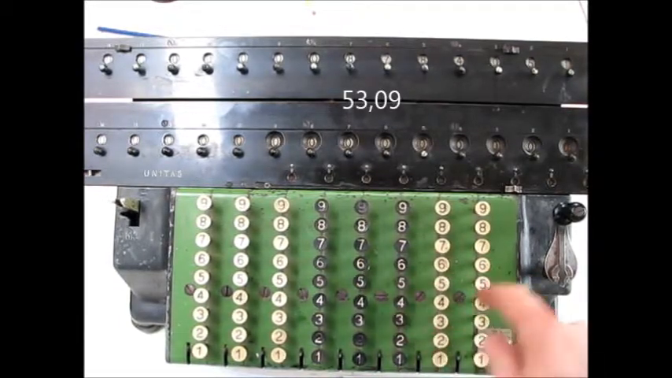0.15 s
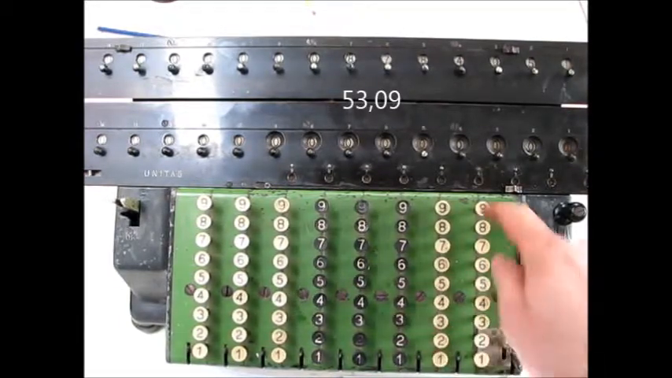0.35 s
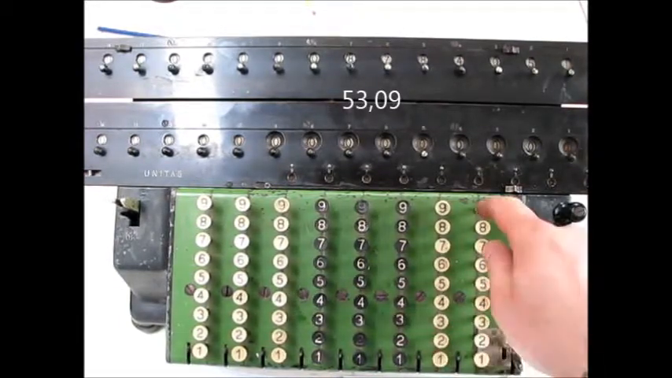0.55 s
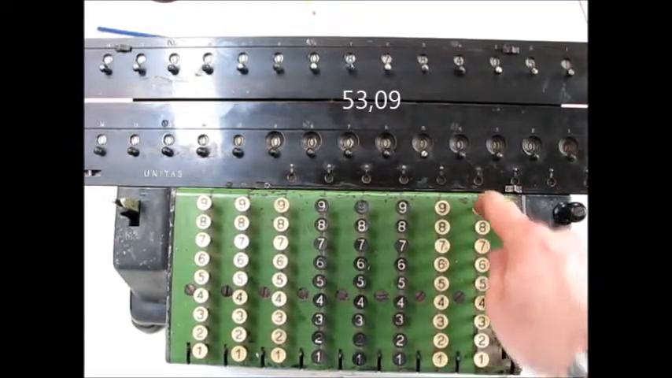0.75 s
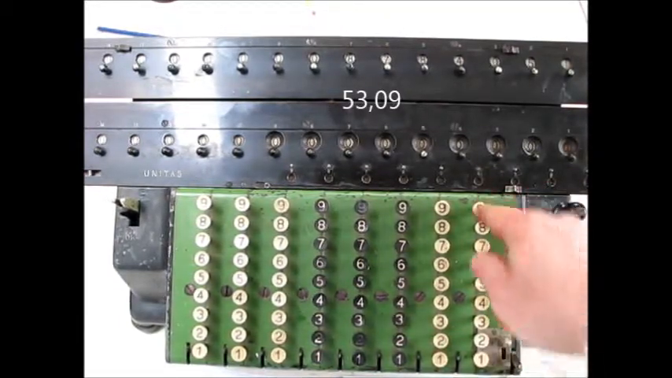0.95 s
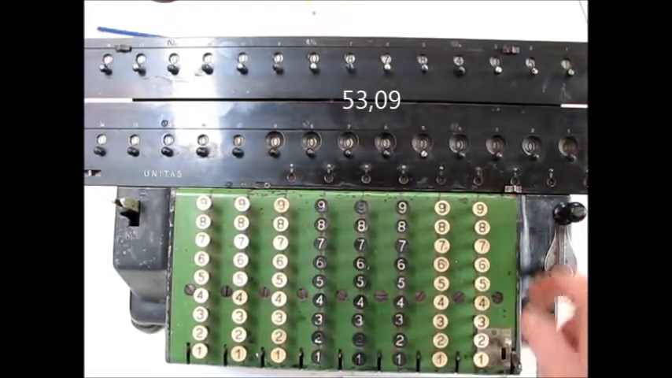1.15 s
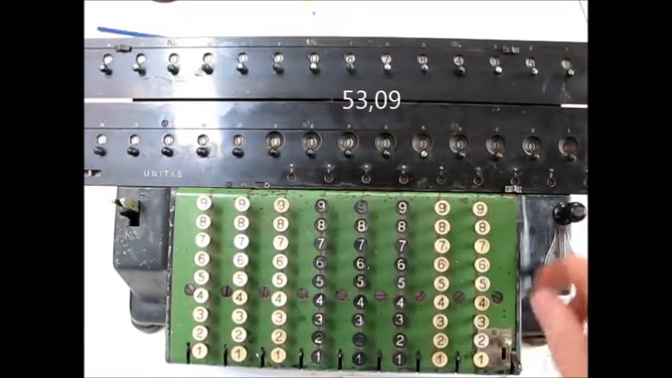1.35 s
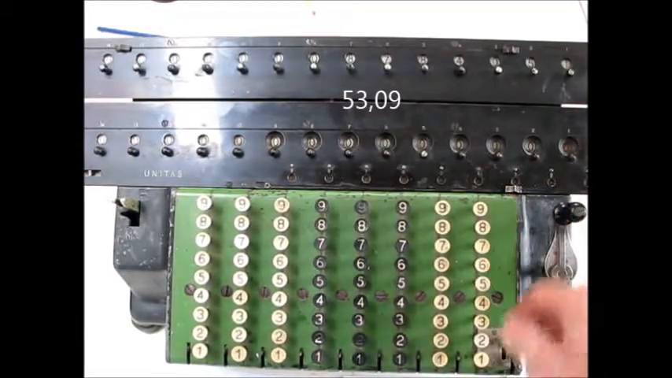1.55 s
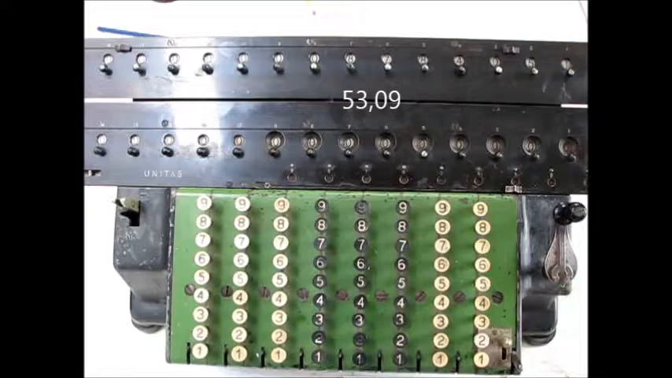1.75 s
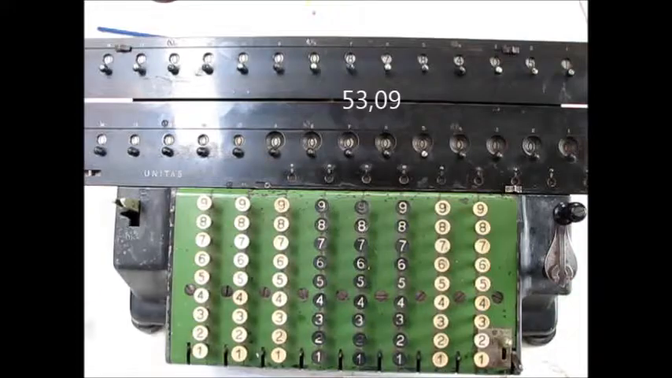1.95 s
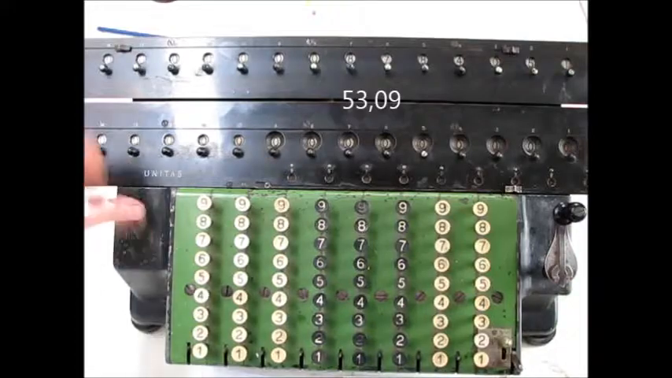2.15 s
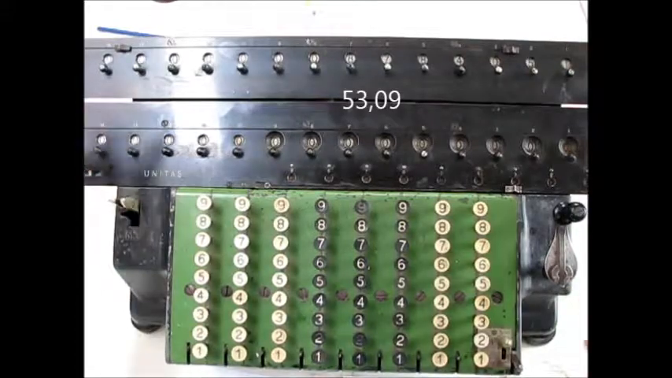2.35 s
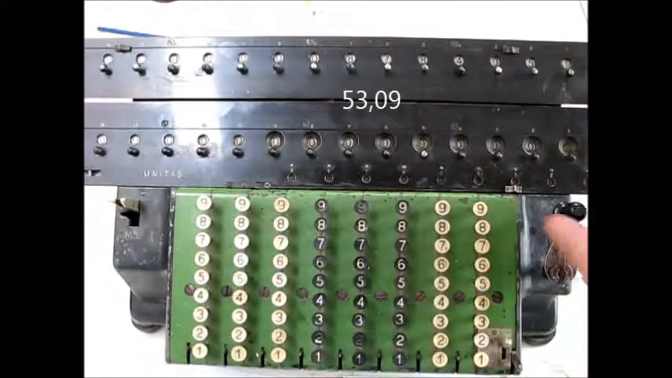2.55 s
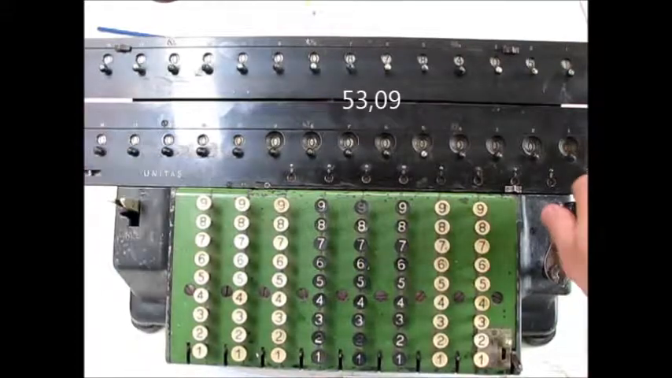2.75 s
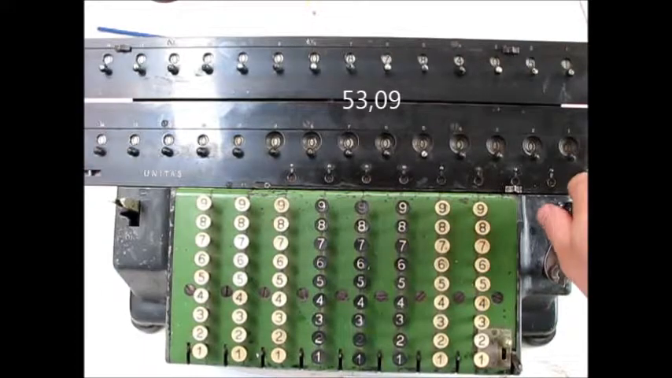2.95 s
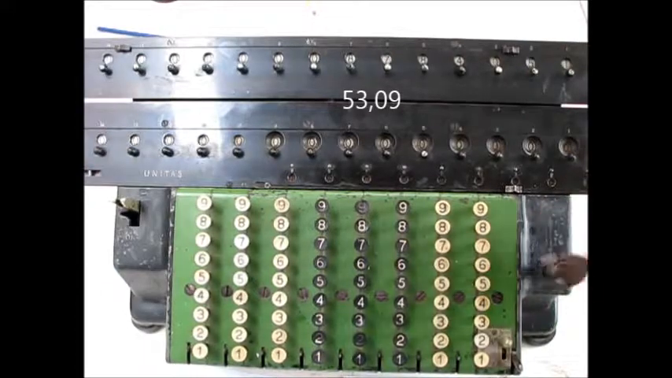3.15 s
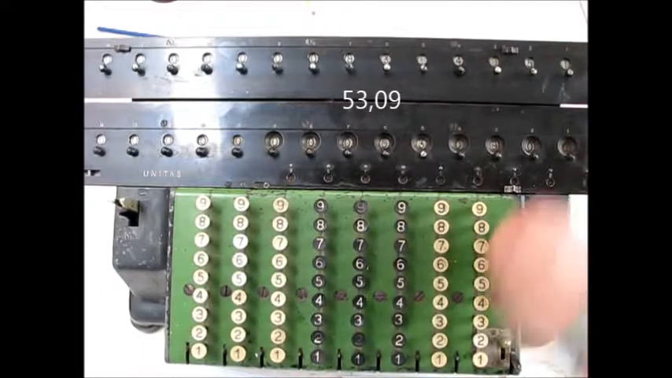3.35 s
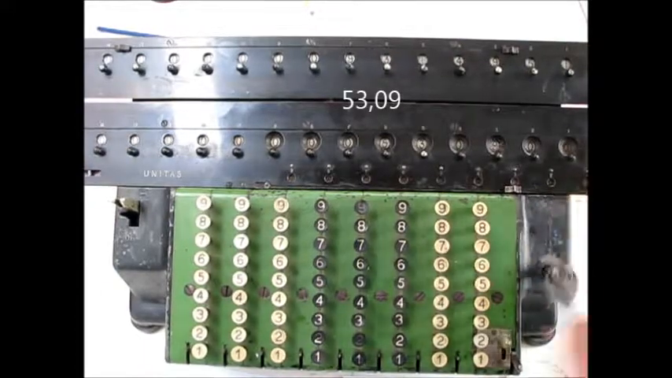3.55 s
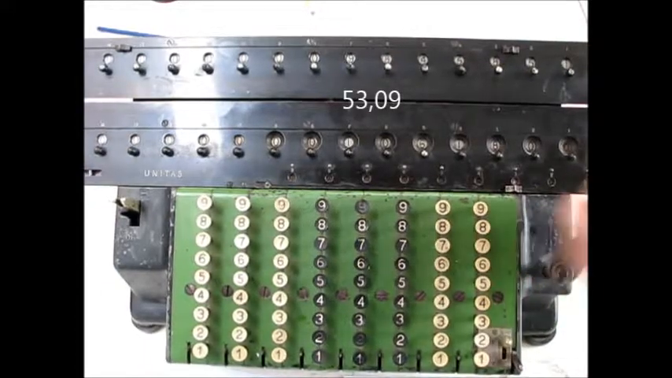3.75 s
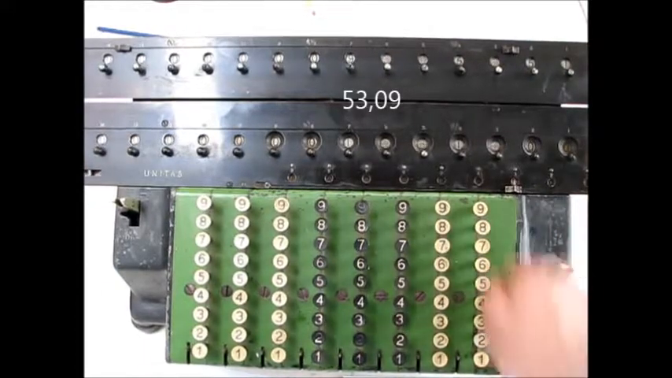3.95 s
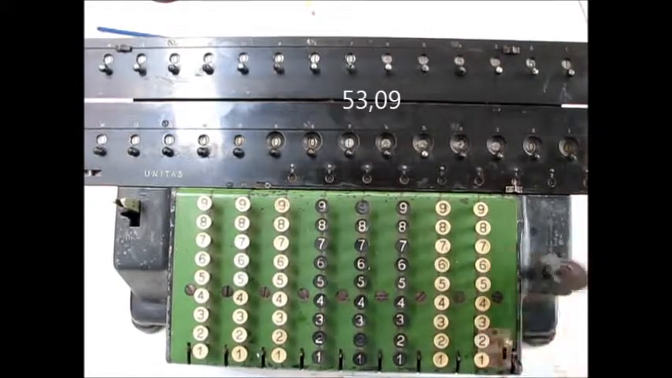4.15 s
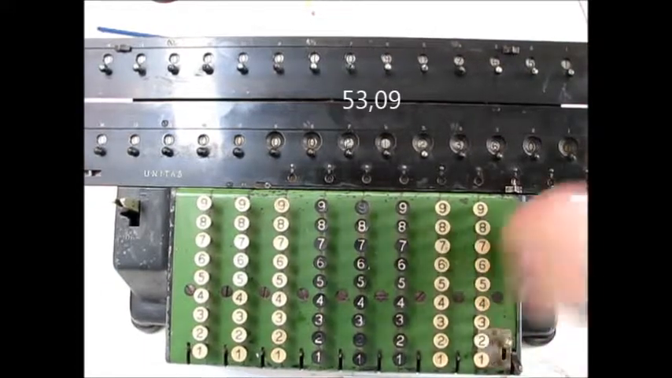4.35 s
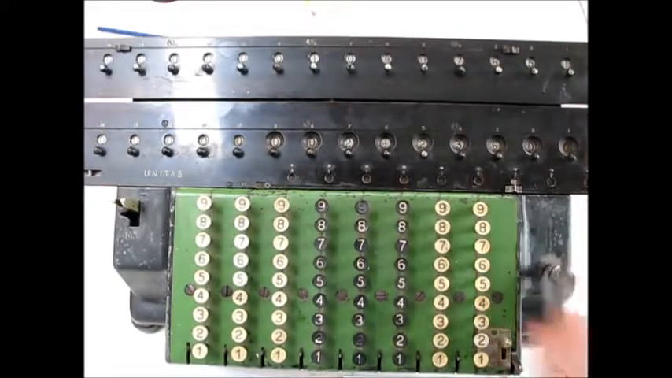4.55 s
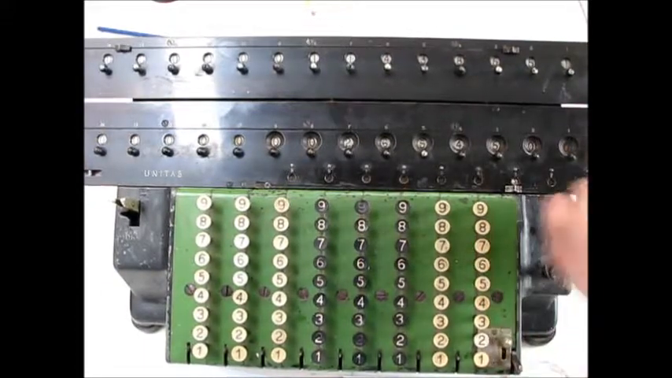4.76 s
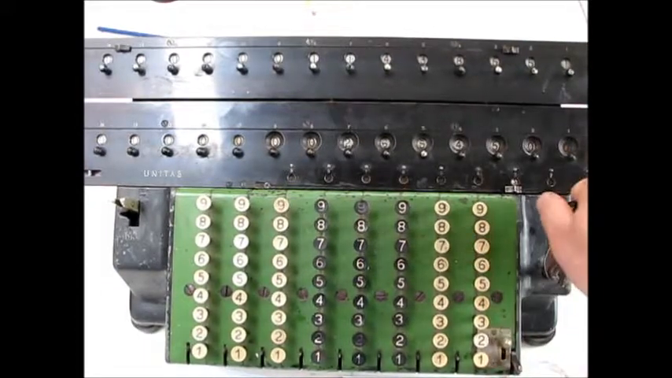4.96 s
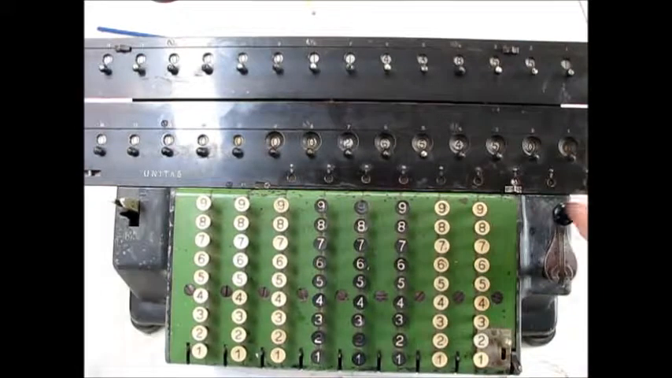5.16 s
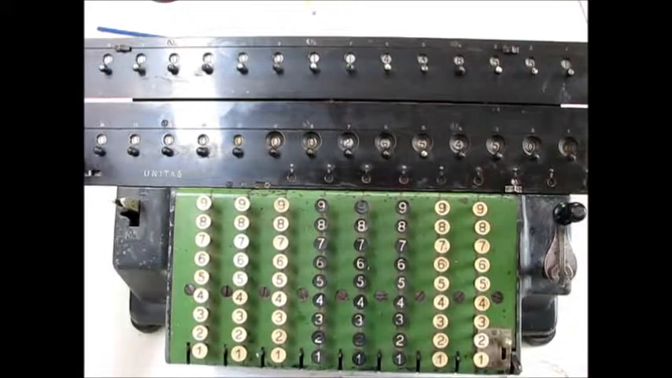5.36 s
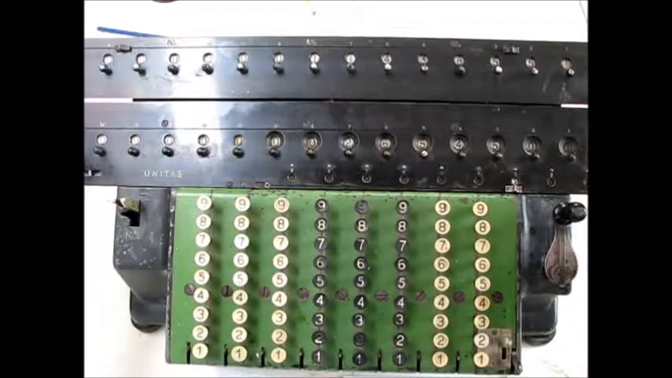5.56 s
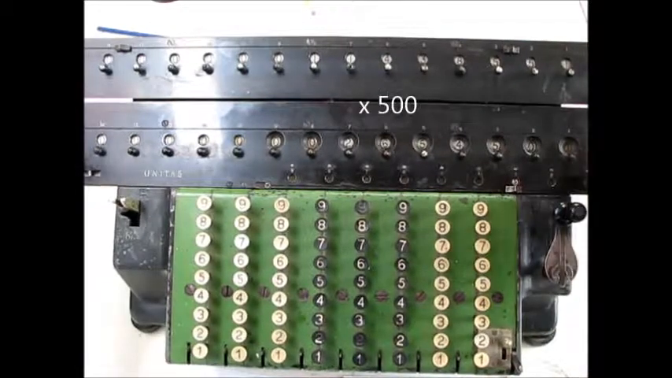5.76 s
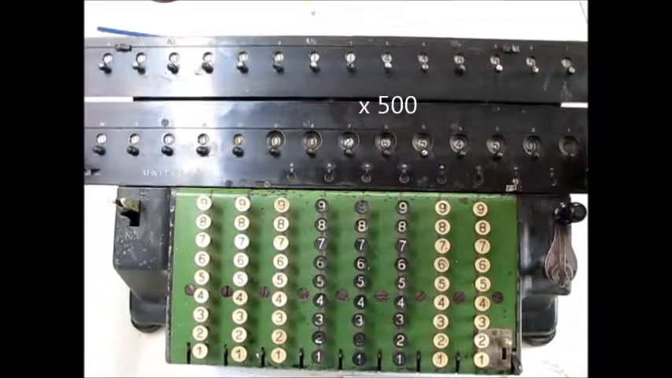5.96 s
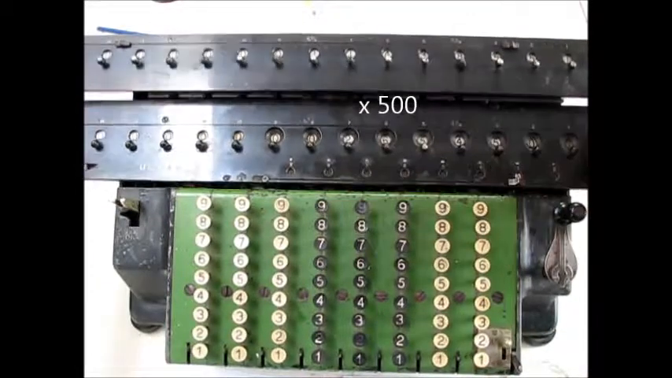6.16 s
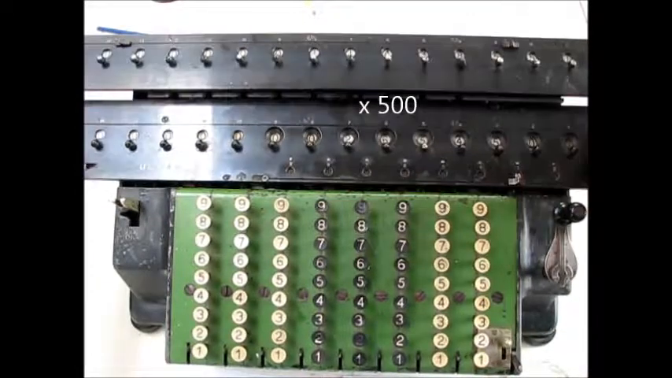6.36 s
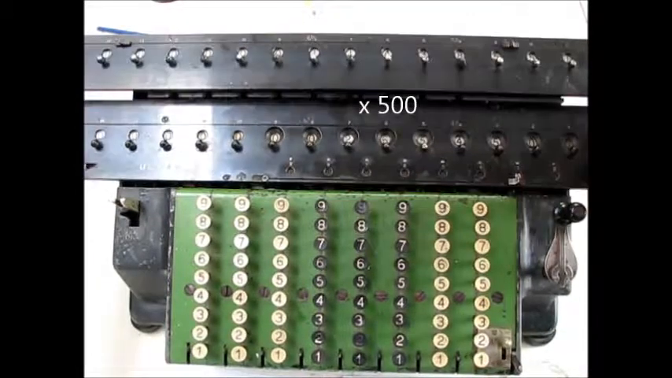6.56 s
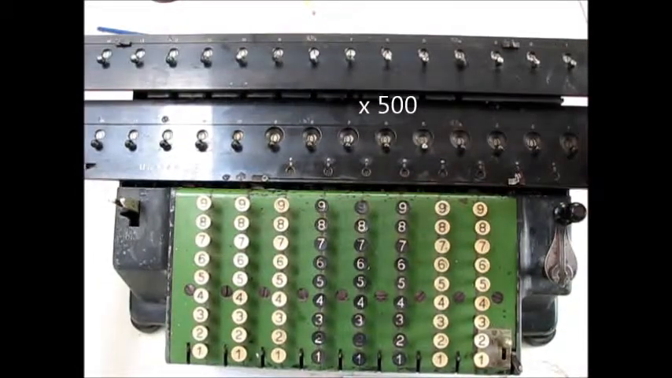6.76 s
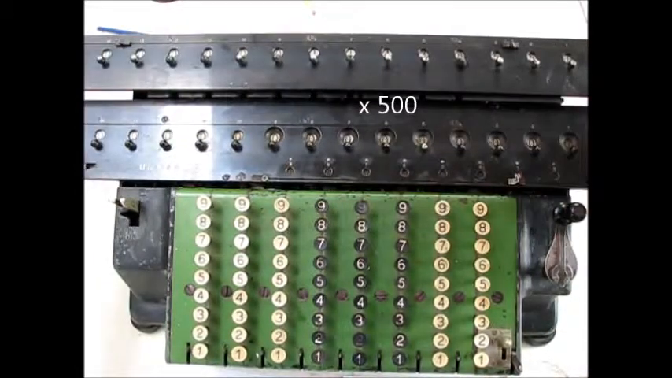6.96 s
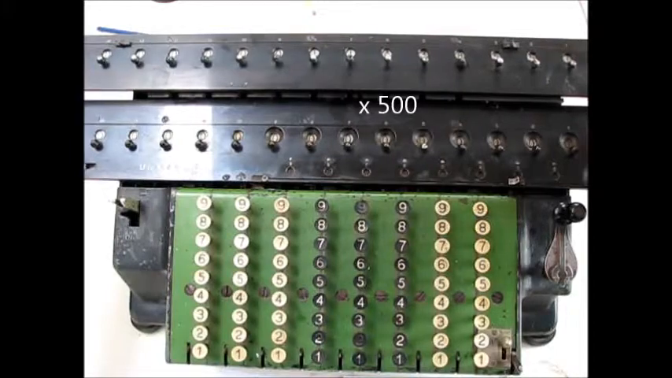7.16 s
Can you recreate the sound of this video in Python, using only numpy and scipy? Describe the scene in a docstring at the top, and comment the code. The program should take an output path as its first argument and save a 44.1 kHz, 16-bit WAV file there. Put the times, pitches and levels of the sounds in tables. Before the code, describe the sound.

In a bare room, an old metal adding machine clicks, whirs through five rapid clattering cranks, rests humming faintly, then its carriage clunks along.

```python
"""First the dying room tail of an earlier key press, over house rumble, hiss and a pulsing electric whine.
A hand-cranked mechanical calculator stands on a desk in a bare room, close under two microphone ports: a key
goes down at 0.7 s, a hand taps and slides on the casing, five crank turns run from 3.1 s, and from 6.2 s the
carriage is lifted, rattles along and drops in two steps. Each contact is a burst of noise force that rings the
resonances of the metal parts; running gears are dense ticks; desk and room answer with noise echoes."""
import sys
import numpy as np
from scipy import signal
from scipy.fft import rfft, irfft, next_fast_len
from scipy.io import wavfile
from scipy.ndimage import uniform_filter1d, map_coordinates

SR = 44100
rng = np.random.default_rng(int(sys.argv[2]) if len(sys.argv) > 2 else 0)


def generate_wav(sig):
    """Save sig (samples, or channels by samples) to the path in sys.argv[1] as 16-bit PCM at SR."""
    pcm = np.round(np.clip(np.atleast_2d(sig).T, -1, 1) * 32767).astype(np.int16)
    wavfile.write(sys.argv[1], SR, pcm)


N = 321924

# What each part of the machine rings with: (frequency [Hz], width [Hz], relative level [dB])
GEARS = [(1564, 200, -5.5), (2020, 430, -3), (2390, 350, -3), (2700, 187, -1), (3010, 390, -1.5),
         (3980, 1220, -6.5)]
BASE = [(104, 48, -10.5), (133.7, 34, -2.5), (170.2, 17.5, 1.5), (228, 57, -3.5)]
FRAME = [(273, 38, 1), (335.7, 51.5, 5), (424, 46, 0.5), (462.4, 6.9, 5), (508, 110, -2)]
PLATES = [(836, 120, -3), (957, 35, 2), (1078, 120, 0), (1252, 154, -0.5), (1424, 233.5, -5)]
PINS = [(4380, 700, -5), (5290, 600, -0.5), (5664, 1110, -3.5), (7360, 1270, -4.5), (7950, 2150, -8)]
PAWLS = [(9560, 2000, -9), (10850, 820, -3), (12040, 2100, -5.5), (14300, 1200, -8), (15000, 1100, -11.5)]
WHEELS = [(3050, 130, -8.5), (5140, 81, 4), (11560, 150, 0.5), (14000, 220, -10.5)]  # the number wheels
RAIL = [(920, 45, -3), (1003, 53, 1.5), (1000, 30, -6.5), (1305, 99, -14), (1630, 280, -10)]  # the carriage rail
PARTS = [GEARS, BASE, FRAME, PLATES, PINS, PAWLS, WHEELS, RAIL]

# Crank turns: (drums engage [s], level [dB], second touch after [s], loudest running at [share of the way
# to the stop], running level [dB], entry level over the running level [dB])
TURNS = [(3.19, -12.5, .005, 0.41, -28, -0.5), (3.5115, -18.5, .0122, 0.62, -31.5, -10.5),
         (3.8529, -15.5, .0068, 0.66, -26.5, -7.5), (4.189, -13.5, .0047, 0.39, -25, -6.5),
         (4.5237, -12.5, .008, 0.46, -26.5, -4.5)]
# The carry stop ends each turn: (time [s], level [dB])
STOPS = [(3.4265, -19), (3.7523, -19.5), (4.0758, -17.5), (4.401, -16.5), (4.762, -15.5)]

SHARP_T60, SHORT_T60, FULL_T60 = .013, .018, .024  # decay of the contact force [s]


def amp(db):
    """Decibels to an amplitude factor."""
    return 10 ** (np.asarray(db) / 20)


def unit(x):
    """Scale to an RMS of one."""
    return x / np.sqrt(np.mean(x ** 2) + 1e-20)


def along(points, hz):
    """Read (frequency [Hz], value) points on a log frequency axis."""
    f, v = np.transpose(points)
    return np.interp(np.log(hz + 1), np.log(f + 1), v)


def curves(rows):
    """One value per sample for each column after the time."""
    s, *cols = np.transpose(rows)
    return [np.interp(np.arange(N) / SR, s, c) for c in cols]


def wobble(rate):
    """A smooth random curve with the given number of knots a second."""
    knots = rng.standard_normal(int(N * rate / SR) + 4)
    return map_coordinates(knots, [np.arange(N) * rate / SR])


def filtered(x, response):
    """Pass x through a complex response of frequency."""
    m = next_fast_len(x.shape[-1] + SR // 2)
    return irfft(rfft(x, m) * response(np.fft.rfftfreq(m, 1 / SR)), m)[..., :x.shape[-1]]


def rung(force, modes):
    """A force through a set of resonances, steep above the top one; the power of white noise is kept."""
    top = 1.32 * modes[-1][0]

    def body(f):
        total = 0
        for k, (centre, width, db) in enumerate(modes):
            damping = 1j * f * abs(width)
            # neighbouring modes alternate in sign
            total = total + (-1) ** k * amp(db) * damping / (centre * centre - f * f + damping + 1e-9)
        return total

    def steep(f):
        return body(f) * (top ** 2 / (top ** 2 - f * f + 1j * f * top)) ** 2

    power = np.mean(abs(steep(np.linspace(1, SR / 2, 8192))) ** 2)
    return filtered(force, steep) / np.sqrt(power)


def spread(pair, colour):
    """Two unrelated signals become left and right, as alike as two close ports hear a diffuse field."""
    # How alike left and right are: (frequency [Hz], correlation)
    likeness = [(60, 0.94), (300, 0.94), (700, 0.76), (1400, 0.62), (3100, 0.18), (6800, -0.026),
                (15000, -0.14)]

    def mid_and_side(hz):
        turn = np.arccos(np.clip(along(likeness, hz), -1, 1)) / 2
        return amp(along(colour, hz)) * [np.cos(turn), np.sin(turn)]

    mid, side = filtered(pair, mid_and_side)
    return np.array([mid + side, mid - side])


def earlier_blow():
    """The dying room tail of a key pressed just before: coloured noise that loses 60 dB in 0.64 s."""
    t = np.arange(N) / SR
    colour = [(150, 8), (400, -0.5), (1200, 2.5), (5000, -5), (15000, -17)]  # (Hz, dB)
    return amp(-42.5 - 60 * t / 0.64) * unit(spread(rng.standard_normal((2, N)), colour))


def background():
    """Air rumble and house murmur, microphone hiss, and a whine on for about half of each pulse period."""
    # Swell of the air before trim and wobble: (time [s], rumble level [dB], room murmur level [dB])
    air_levels = [(0, -61, -59), (.45, -56, -56.5), (.9, -65, -58.5), (1.1, -59, -61.5), (1.4, -59, -61),
                  (1.9, -58.5, -56.5), (2.25, -55.5, -56), (2.95, -57, -52), (3.5, -63, -54),
                  (4.9, -65.5, -64), (5.2, -60.5, -54.5), (5.7, -61, -56.5), (6.1, -62, -52.5),
                  (6.5, -57.5, -52), (6.62, -75, -59), (7.3, -74, -60.5)]
    # Noise colours: (frequency [Hz], relative level [dB per Hz])
    hiss_colour = [(290, -36), (500, -13.5), (773, -5.5), (1030, -6.5), (7210, -14), (7860, -12),
                   (8450, -16), (13300, -19.5), (16000, -26)]
    murmur_colour = [(47, -34.5), (80, -6.5), (257, -8), (315, -10.5), (438, -14), (1200, -28), (1560, -51),
                     (2640, -120)]
    rumble_colour = [(11, -31.5), (18, 0.5), (49, 1.5), (60, -6), (75, -27.5), (110, -21), (140, -47),
                     (240, -120)]
    whine_hz, pulse_hz = 7867.1, 29.97
    pulse_start, whine_end = .0266, 6.57  # pulse phase and end of the whine [s]

    def noise(colour):
        return unit(spread(rng.standard_normal((2, N)), colour))

    rumble_db, murmur_db = curves(air_levels)
    rumble = amp(rumble_db + 3.5 + 0.85 * wobble(5.0)) * noise(rumble_colour)
    murmur = amp(murmur_db - 2.5 + 2.22 * wobble(9)) * noise(murmur_colour)
    hiss = amp(-60) * noise(hiss_colour)
    t = np.arange(N) / SR
    pulses = (((t - pulse_start) * pulse_hz) % 1 < .52) & (t < whine_end)
    gate = uniform_filter1d(pulses * 1., size=40)  # edges of about 1 ms
    whine = amp(-64.0) * gate * np.sin(2 * np.pi * whine_hz * t)
    return rumble + murmur + hiss + whine


def contacts():
    """Every metal contact as (time [s], gear level [dB], tone, factor on the tone's decay)."""
    # How each kind of contact shares out, before the part trims: (base, frame, plates, pins, pawls over the
    # gears [dB], wheels over the pawls [dB], rail over the plates [dB], t60 [s])
    key_tone = (-24, -10.5, -8.5, -7, -16, -8.5, -6.5, SHORT_T60)
    touch_tone = (-13, -2.99, -6.5, -8.5, -19, -7.5, -22.5, SHARP_T60)
    engage_tone = (-18.5, -15.5, -10.5, -5, -6, -5, -9.5, FULL_T60)
    tooth_tone = (-17, -13, -13, -6, -3.2, -4.5, -12, SHORT_T60)
    stop_tone = (-28, -32, -17, 6.5, -7, -8, -12.5, SHORT_T60)
    lift_tone = (6, 1, -5.5, -7, -24.5, -8, 11, SHARP_T60)
    carriage_tone = (-30.5, -21, -8.5, -1.5, -2, -6.5, -4, FULL_T60)
    # A key touches, goes down, rattles, latches, bounces and is let go: (time [s], gear level [dB],
    # weight [dB], plates [dB], brightness [dB], pins [dB], t60 over the usual [factor])
    key = [(.697, -41, 5, -2.5, -6, -5, .8), (.718, -11, 1.5, -8, -4, 1.5, 1.4),
           (.7365, -27.5, -0.5, -4, -0.5, 7, .9), (.7692, -9.5, -0.5, 2, 9.5, 3, .6),
           (.7755, -27.5, 6, 7, -7, -1, 1.3), (.961, -32.5, -4.5, -3, -4.5, -4.5, 1.1),
           (.966, -33.5, -3.5, 6.5, 4, 1, .9)]
    # Fingers tap levers and casing: (time [s], gear level [dB], weight [dB], plates [dB], brightness [dB])
    touches = [(2.064, -65, 16, 0, 10), (2.1157, -54, 15.5, 4, 8), (2.172, -40.5, 6.5, 7, -2.5),
               (2.229, -56, 12, 6, -2), (2.399, -61, 13, 2, 10), (2.627, -63, 10.5, 4, 13),
               (2.764, -54, -8, 19, 0), (2.2668, -43.5, -7, -3, -7.5), (2.6501, -43, 1.5, 2, -6),
               (2.7392, -55.5, 9, 17.5, 5.5), (2.7752, -40, -11, -3, 3), (5.0516, -35.5, -9, -1, -7),
               (5.351, -53, 10.5, -11, 18), (5.8107, -69, 24.5, 3, 8), (5.832, -69.5, 20.5, 3, 8)]
    # Loudest single teeth: (time [s], gear level [dB], weight [dB], plates [dB], brightness [dB])
    teeth = [(3.1412, -25.5, -5.5, 5, -14.5), (3.1699, -23.5, 6, 9.5, -14), (3.2035, -23.5, 13, 10.5, 1.5),
             (3.2138, -26, -6, -2, 12.5), (3.235, -27, -0.5, -3.5, 8.5), (3.2448, -25, 12, -0.5, 6.5),
             (3.3122, -29, 3, -4.5, 8), (3.5146, -27, 6, 0.5, 11.5), (3.5674, -32, 5, -1, 2),
             (3.6305, -28.5, -8, 0, 4), (3.6487, -30.5, -1.5, 2, 0.5), (3.6696, -29, 7.5, 7, 0),
             (3.8749, -30.5, -12.5, -3, 4), (3.8943, -30, -1, 2, 3), (3.949, -27, 0.5, 4.5, 6),
             (3.9594, -26.5, 2.5, -2, 7), (3.9848, -27.5, -3, 5, 5), (4.1728, -29.5, 0, 3.5, 5),
             (4.2076, -28, -6.5, -2.5, 5.5), (4.2361, -28, -1.5, -14, 3.5), (4.2813, -30.5, 4.5, -3, 2),
             (4.3006, -28, 0, -9, 9), (4.4988, -34.5, -10, 0, 2), (4.5438, -28.5, 6, 0, 3),
             (4.629, -28, 3, 3, 3.5), (4.6425, -25, -12, 8, 6), (3.2247, -22, -3, 0, 3.5),
             (3.256, -18, 1, 0, -1.5), (3.2763, -16, -4.5, -6.5, 1), (3.2806, -22, -7.5, 11, 6),
             (3.2907, -18, -2.5, 7, 5), (3.3007, -14, -5, -11, 3.5), (3.3296, -27, -1.5, 3, 6.5),
             (3.3515, -21.5, 3, -2.5, 6), (3.3614, -22, -7.5, 0, 8), (3.5846, -24.5, 3.5, -9, -7),
             (3.6202, -25, -5.5, 5, 3), (3.6409, -23.5, 3, 2.5, 1), (3.6561, -22.5, -15, 1, 1.5),
             (3.6861, -26.5, 0, -1, -2.5), (3.8367, -22.5, 2, 3, 4.5), (3.912, -18, 3, -8, -6.5),
             (3.9683, -21, 0, 14, 2.5), (3.9945, -22.5, -3, -6, -7), (4.007, -20, -2, -9.5, 5.5),
             (4.0143, -18, 6.5, 0, 4), (4.026, -15.5, -3.5, 3, 2), (4.1591, -20.5, 0, 1, -4.5),
             (4.2659, -26, 1.5, -0.5, 6.5), (4.2945, -17, -1.5, -5.5, 4.5), (4.3235, -18, 5, 5.5, 4.5),
             (4.3433, -18.5, -2.5, -9, 1), (4.482, -19.5, -3.5, -3.5, -7.5), (4.572, -18, 0, -5, 4.5),
             (4.5993, -26.5, 1.5, 4, 9.5), (4.6748, -19.5, 1.5, -3, 4)]
    # The carriage is lifted off its rail: (time [s], gear level [dB], weight [dB], plates [dB], brightness [dB])
    lift = [(6.1748, -29.5, 2, 1.9, 4.5), (6.1875, -27.5, -3.5, 0, -8)]
    # The carriage rattles along and drops in two steps: (time [s], gear level [dB], weight [dB],
    # plates [dB], brightness [dB], pins [dB], t60 over the usual [factor])
    carriage = [(6.568, -14, 4, 1, -6.5, -5, 0.61), (6.5745, -24, 4.5, -1, 8.5, 1, .8),
                (6.5827, -25, 3, 4.5, 16.5, -1, 2.2), (6.5869, -22, -6, -8, 3, -3, 1.5),
                (6.5936, -21.5, -5, -3, 9.5, -7.5, 1.5), (6.6002, -19.5, -2, 0.5, 0.5, -0.5, 0.74),
                (6.6038, -22, -5, -8, -2.5, 0, 1.4), (6.7751, -21, 5.5, 1.5, 1.5, -3, 1.2),
                (6.7796, -24.5, 14, 1.5, -12, 5.5, 0.99), (6.9807, -13.5, -1.5, 2, -6.5, -5, 1.2),
                (6.9917, -13.5, -1.5, -10.5, -4, -0.5, .8), (6.9954, -23, -13, 1.5, 2.5, 6, 1.1)]
    base_share, pin_share = 1.53, 0.24  # how far base follows weight and pins follow brightness
    usual = 1

    rows = []
    for (engage, engage_db, gap, *_), (stop, stop_db) in zip(TURNS, STOPS):
        rows.append((engage, engage_db, engage_tone, usual))
        rows.append((engage + gap, engage_db - 3, engage_tone, usual))  # second touch
        rows.append((stop, stop_db, stop_tone, usual))
        rows.append((stop + .0092, stop_db - 5.5, stop_tone, usual))  # bounce off the stop
    kinds = [(teeth, tooth_tone), (key, key_tone), (touches, touch_tone), (lift, lift_tone),
             (carriage, carriage_tone)]
    for table, tone in kinds:
        for s, db, weight, plate, bright, *more in table:
            pin, longer = more or (0, usual)
            shift = [base_share * weight, weight, plate, pin_share * bright + pin, bright, 0, 0, 0]
            rows.append((s, db, tone + np.array(shift), longer))
    return rows


def blow_forces():
    """Each contact is a crack and a short rough push on every part; long pushes start softer.

    Second layer: the same energy in one instant, the mean over all directions that fills the room."""
    force, t = np.zeros((2, len(PARTS), N + SR)), np.arange(SR // 10) / SR
    for s, db, tone, longer in contacts():
        base_db, frame_db, plate_db, pin_db, pawl_db, wheel_db, rail_db, t60 = tone
        t60 = max(t60 * longer, .003)
        push = amp(-60 * t / t60) * (1 - np.exp(-t / (0.056 * t60)))
        crack = (0.024 / t60) ** 2 * amp(-60 * t / 0.0035)
        shape = push + crack
        shape *= 8.05 / np.linalg.norm(shape)  # short or long, a contact of one level spends one energy
        over_gears = np.array([-4, base_db + 6.5, frame_db + 6.5, plate_db + 3.0, pin_db - 2.5,
                               pawl_db - 1.5, pawl_db + wheel_db, plate_db + rail_db])
        sizes = amp(db + over_gears)
        rough = shape * rng.standard_normal((len(PARTS), len(t)))
        at = round(s * SR)
        force[0, :, at:][:, :len(t)] += sizes[:, None] * rough
        instant = sizes * np.linalg.norm(shape) * rng.choice([-1, 1], size=len(PARTS))
        force[:, :, at] += [0.46 * instant, instant]  # the first touch is one clean impact
    return force[..., :N]


def machine():
    """All contacts ring the same parts; returns the sound towards the microphones and towards the room."""
    # A hand slides on the machine, one list a slide, before the part trims:
    # (time [s], gears level [dB], frame level [dB], pawls level [dB])
    slides = [
        [(2.0, -67, -75.5, -83), (2.165, -63, -62, -78), (2.185, -55.5, -44.5, -72), (2.28, -59, -47.5, -75),
         (2.4, -66, -70.5, -75.5)],
        [(2.58, -64, -56, -78), (2.645, -64, -53.5, -79.5), (2.668, -58.5, -46.5, -79), (2.738, -62, -49, -75),
         (2.95, -61, -68, -76)],
        [(4.95, -54, -51, -75), (5.072, -56.5, -58, -80), (5.2, -76, -58, -88)],
    ]
    force = blow_forces()
    force += sum(rubbing(rows, 120, smooth=1.0, wheel_db=-33) for rows in slides)
    force += rubbing(turning(), 360, smooth=1.64, wheel_db=-10.5)  # gear teeth
    return sum(rung(force[:, k], modes) for k, modes in enumerate(PARTS))


def scatter(x):
    """Desk and casing scatter the contacts: a fresh 16 ms noise echo for every 23 ms of sound."""
    out, hop = np.zeros((2, N + SR)), 1024
    for start in range(0, N, hop):
        echo = amp(-60 * np.arange(700) / SR / .012) * rng.standard_normal((2, 700))  # t60 12 ms
        wet = signal.fftconvolve(x[None, start:start + hop], echo / np.linalg.norm(echo[0]), axes=1)
        out[:, start:start + wet.shape[1]] += wet
    return spread(out[:, :N], [(300, -12), (3000, 0.0), (12000, 3.5)])  # (Hz, dB)


def room(x):
    """Diffuse tail, drawn anew for each quarter second; each frequency dies at its own speed."""
    # Decay of the bare room: (frequency [Hz], t60 [s])
    decay = [(100, 0.59), (300, 1), (1000, 1), (3000, 0.9), (7000, 0.81), (14000, 0.36)]
    # Colour of the tail: (frequency [Hz], level [dB])
    tail_colour = [(100, 3.5), (400, -3.5), (2000, 2), (6000, 3), (14000, 5.5)]
    out, hop = np.zeros((2, N + 2 * SR)), SR // 4
    delay = 200  # samples, 4.5 ms
    for start in range(0, N, hop):
        hz, t, z = signal.stft(rng.standard_normal((2, SR)), SR, nperseg=256)
        early = 1 + 1.85 * amp(-60 * t / 0.41)  # the nearest walls and the desk answer first and louder
        fade = amp(-60 * t / along(decay, hz)[:, None])
        tail = signal.istft(z * early * fade, SR, nperseg=256)[1]
        wet = signal.fftconvolve(x[None, start:start + hop], tail / np.linalg.norm(tail[0]), axes=1)
        out[:, start + delay:start + delay + wet.shape[1]] += wet
    return spread(out[:, :N], tail_colour)


def rubbing(rows, ticks_per_s, smooth, wheel_db):
    """Ticks at uneven times and sizes, each a few milliseconds of rough contact, over a sliding scrape."""
    a, b = round(rows[0][0] * SR), round(rows[-1][0] * SR)
    gear_db, frame_db, pawl_db = np.array(curves(rows))[:, a:b]
    sizes = amp(4.1 * rng.exponential(size=2 * SR).clip(0, 3))
    ticks = (rng.random(2 * SR) < ticks_per_s / SR) * sizes
    contact = signal.fftconvolve(ticks, amp(-60 * np.arange(1200) / SR / 0.031))[:2 * SR]
    # the steady part, smooth, is the scrape
    rough = unit(smooth + unit(contact)) * rng.standard_normal((len(PARTS), 2 * SR))
    levels = [gear_db - 2.0, frame_db - 9.5, frame_db - 3, (gear_db + frame_db) / 2 - 3.5,
              gear_db - 6.0, pawl_db - 3.0, pawl_db + wheel_db, frame_db - 24.5]  # in the order of PARTS
    force = np.zeros((len(PARTS), N))
    force[:, a:b] = rough[:, :b - a] * amp(levels)
    return force


def turning():
    """Levels of the running train as rubbing() rows: each turn swells, runs out to its stop, then idles."""
    # Slack leaves the gear train: (time [s], gears level [dB], frame level [dB], pawls level [dB])
    take_up = [(3.05, -57, -44, -69), (3.064, -50, -34, -69), (3.095, -45.5, -42.5, -68.5),
               (3.11, -55.5, -50, -68.5), (3.14, -41, -36.5, -67), (3.175, -35.5, -31, -45.5)]
    # After the loudest running: (share of the way left to the stop, then gears [dB], frame [dB]
    # and pawls [dB] over the running level)
    run_out = [(.45, -6, -7, -20), (.8, -12, -16, -22.5), (1, -14, -13, -19.5)]
    idle_s, idle_db = 0.04, (-39, -43, -42)  # this long before the next turn: gears, frame, pawls

    rows = list(take_up)
    for k, ((engage, _, _, share, db, entry_db), (stop, _)) in enumerate(zip(TURNS, STOPS)):
        top = engage + share * (stop - engage)
        if k:
            rows.append((engage - idle_s, *idle_db))
        entry = db + entry_db
        rows.append((engage + .012, entry, entry - 4, entry - 2.5))
        rows.append((top, db, db - 3.5, db - 2))
        for part, *under in run_out:
            rows.append((top + part * (stop - top), *(db + np.array(under))))
    return sorted(rows)


def spring():
    """A spring goes on humming after the crank stops: one thin, slightly unsteady 460 Hz tone."""
    # The hum before trim and wobble: (time [s], level [dB])
    hum_levels = [(4.8, -63), (4.848, -55.5), (6.0, -61.5), (6.56, -62)]
    t = np.arange(N) / SR
    sounding = (t > hum_levels[0][0]) & (t < hum_levels[-1][0])
    humming = uniform_filter1d(sounding * 1., size=2000)  # fades of 45 ms
    return humming * amp(curves(hum_levels)[0] + 2.5 + 0.92 * wobble(33)) * np.sin(2 * np.pi * 460 * t)


def scene():
    """The machine reaches both ports directly and by scatter; the room follows."""
    front, around = machine()
    direct = front * amp([[-4], [-3]])  # left, right
    scattered = amp([[-.6], [.4]]) * scatter(front)
    tail = amp(-8.0) * room(around)
    return earlier_blow() + background() + direct + scattered + tail + spring()


def record(dry):
    """The microphones pass nothing above their band limit of 15.9 kHz."""
    return filtered(dry, lambda hz: hz < 15900)


dry = scene()
out = record(dry)
generate_wav(out)
```